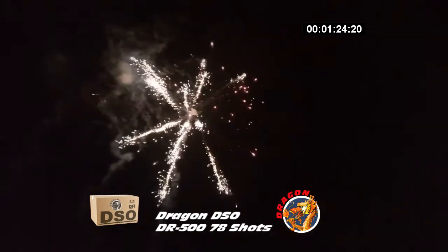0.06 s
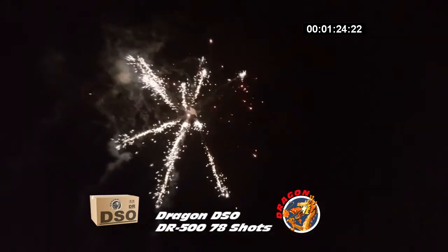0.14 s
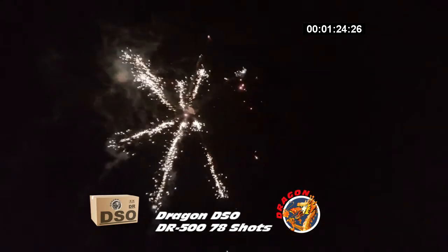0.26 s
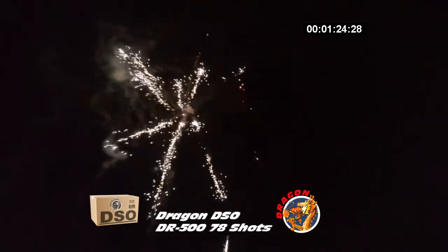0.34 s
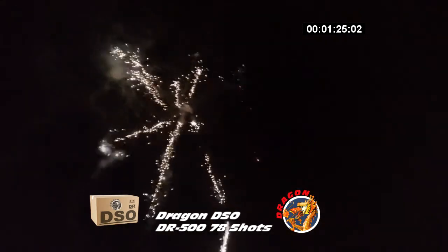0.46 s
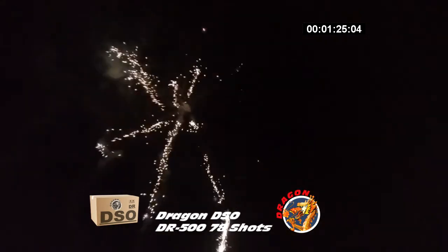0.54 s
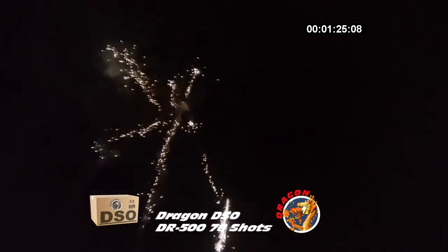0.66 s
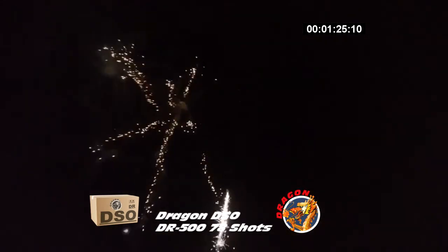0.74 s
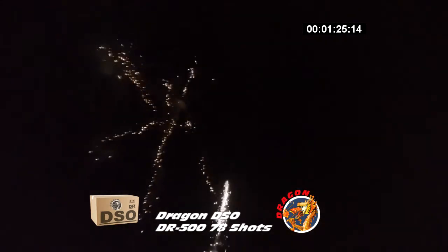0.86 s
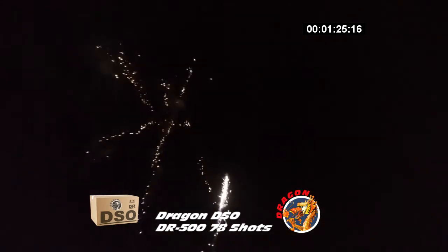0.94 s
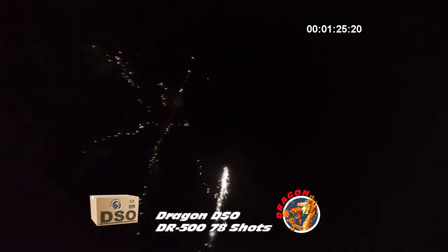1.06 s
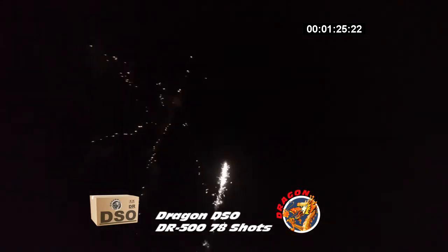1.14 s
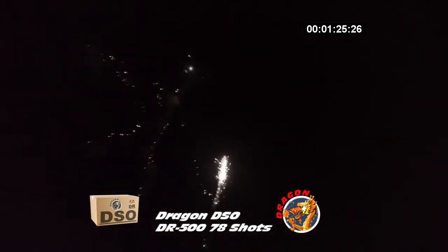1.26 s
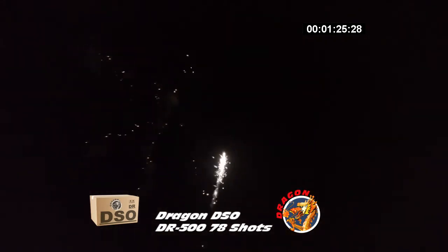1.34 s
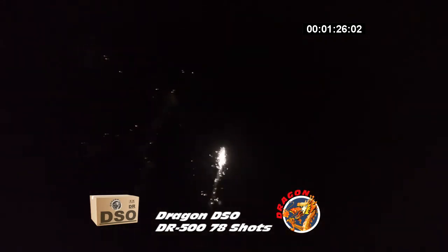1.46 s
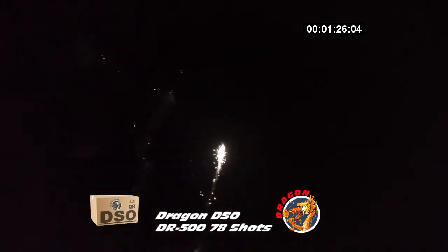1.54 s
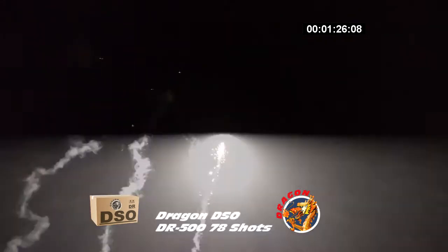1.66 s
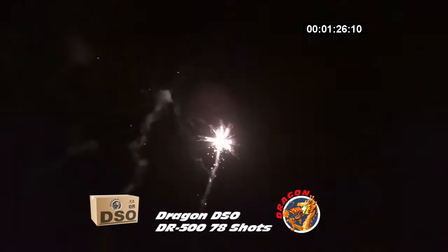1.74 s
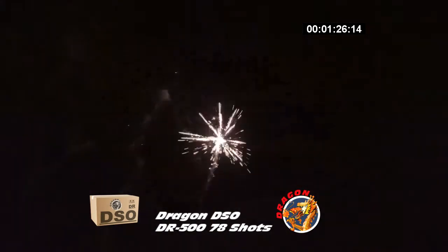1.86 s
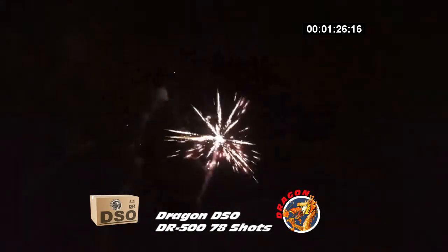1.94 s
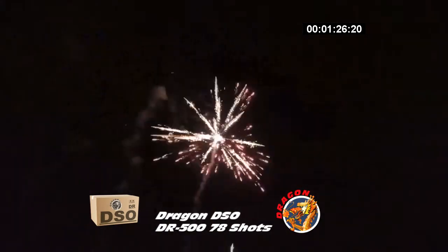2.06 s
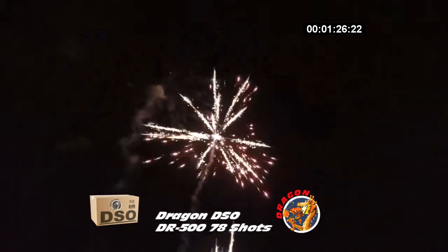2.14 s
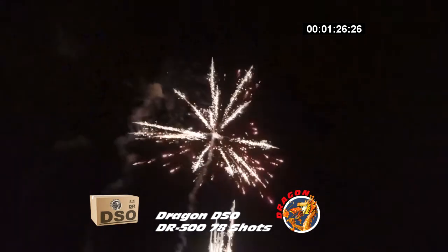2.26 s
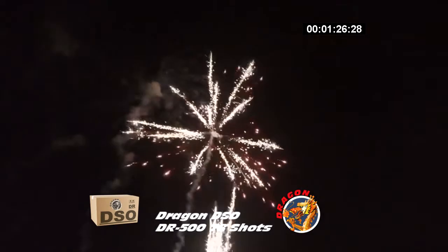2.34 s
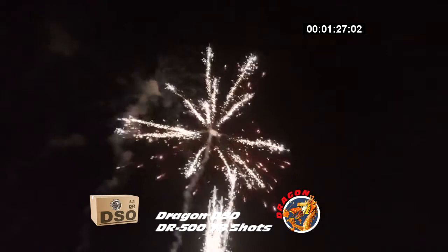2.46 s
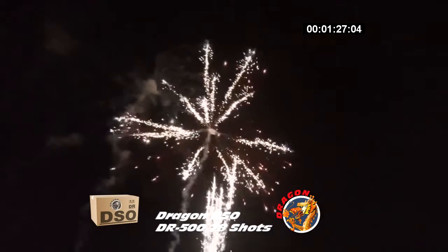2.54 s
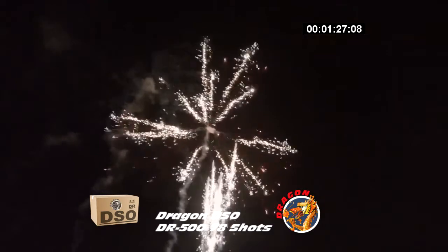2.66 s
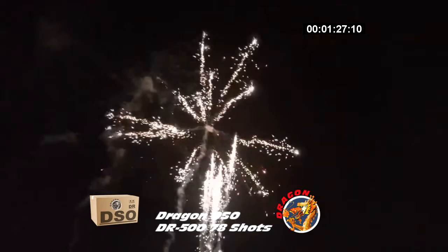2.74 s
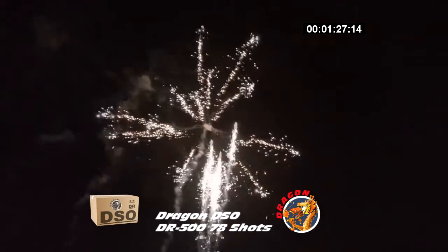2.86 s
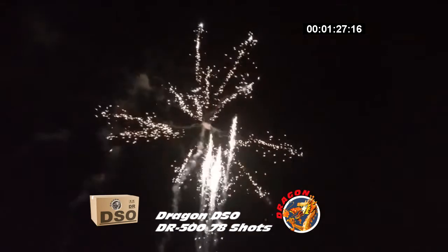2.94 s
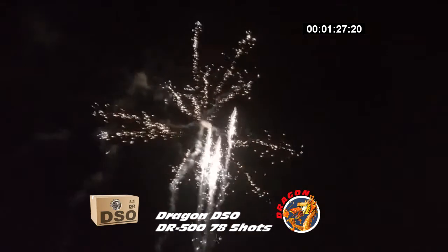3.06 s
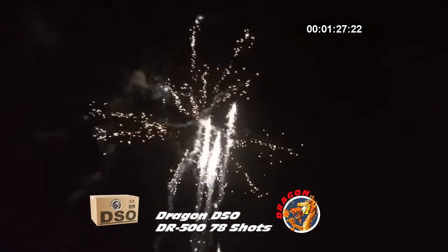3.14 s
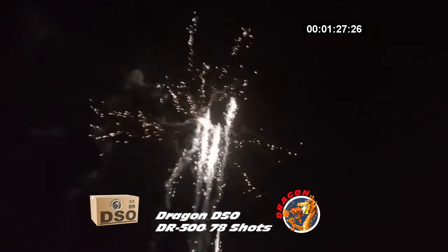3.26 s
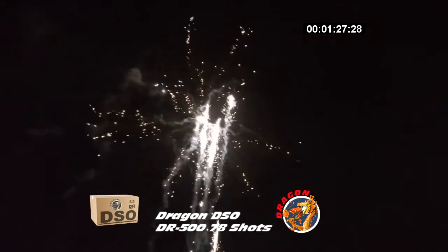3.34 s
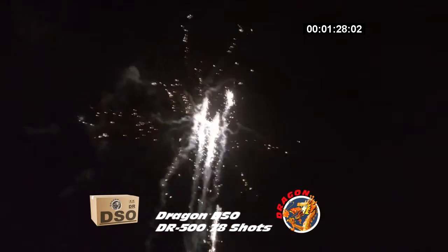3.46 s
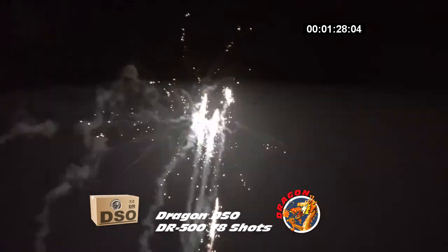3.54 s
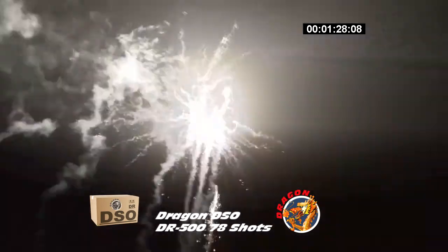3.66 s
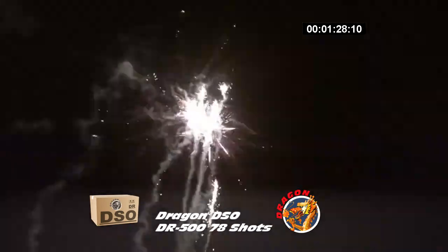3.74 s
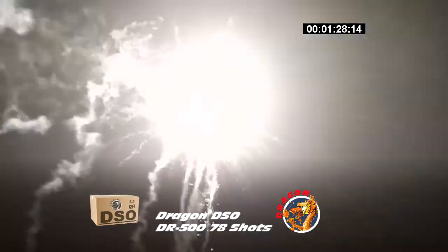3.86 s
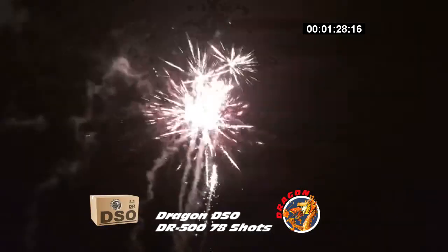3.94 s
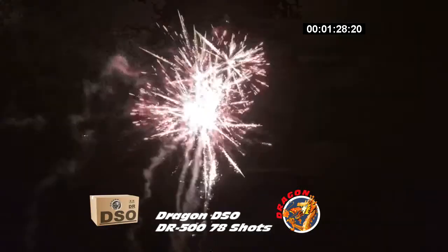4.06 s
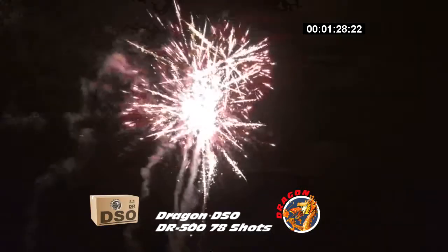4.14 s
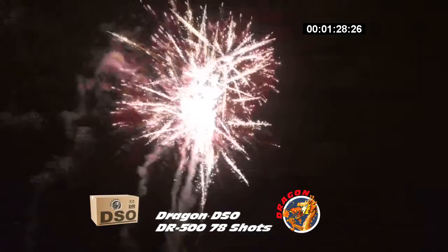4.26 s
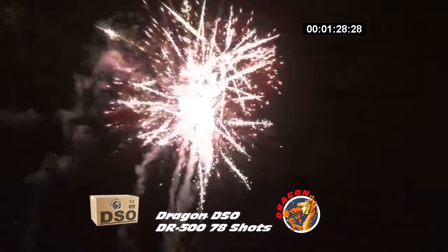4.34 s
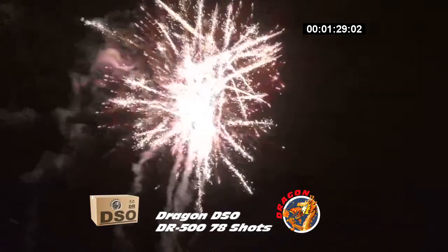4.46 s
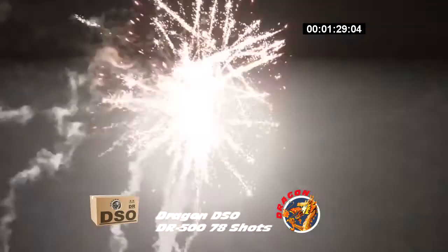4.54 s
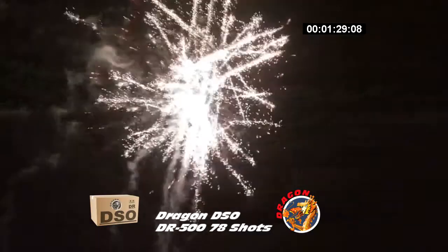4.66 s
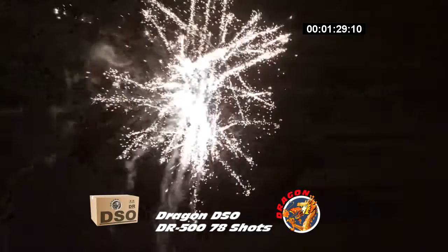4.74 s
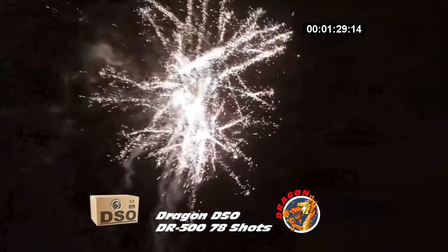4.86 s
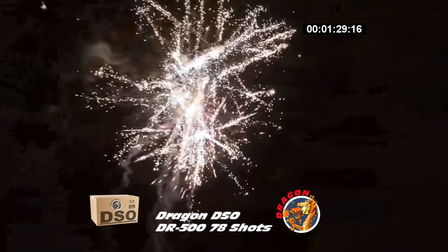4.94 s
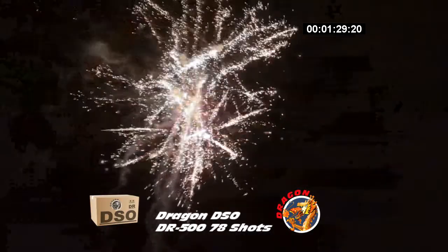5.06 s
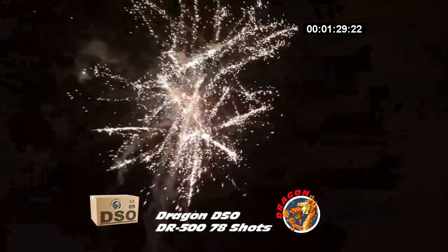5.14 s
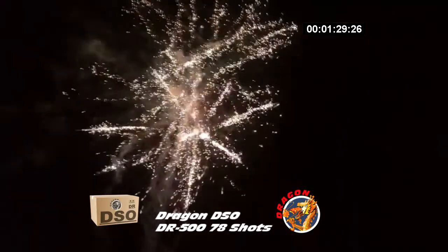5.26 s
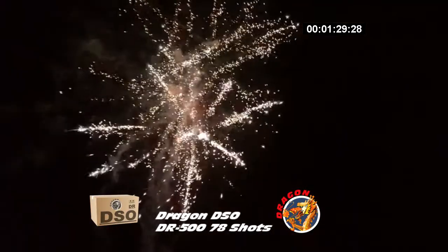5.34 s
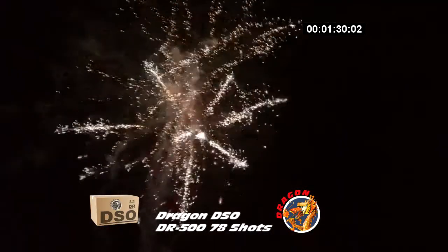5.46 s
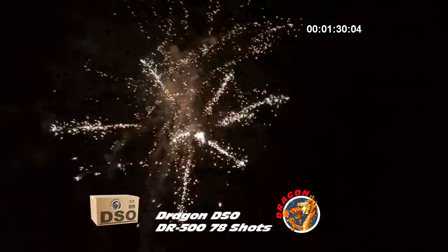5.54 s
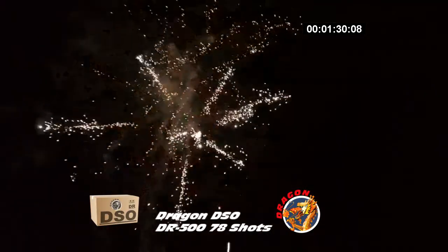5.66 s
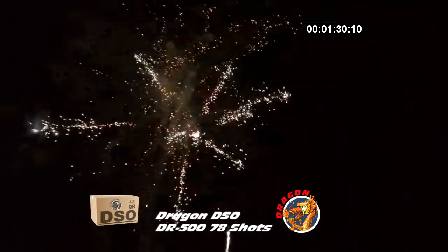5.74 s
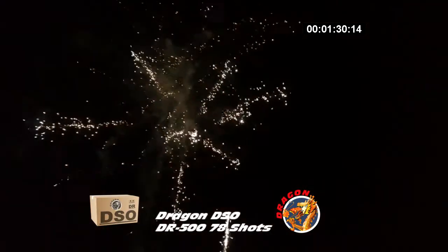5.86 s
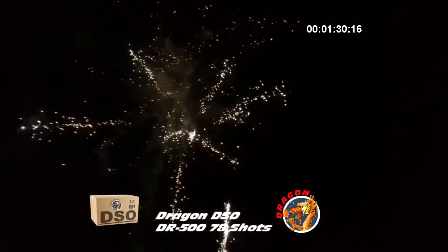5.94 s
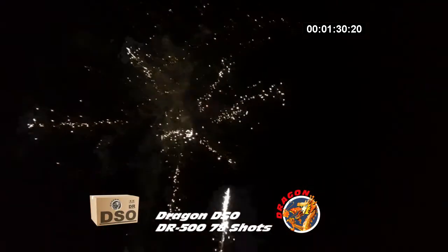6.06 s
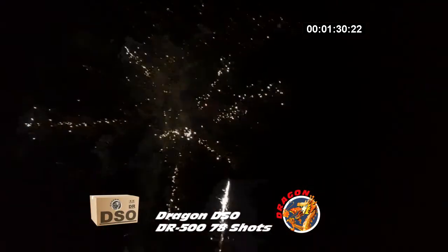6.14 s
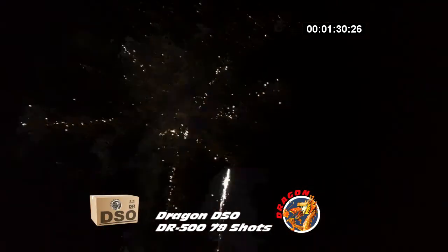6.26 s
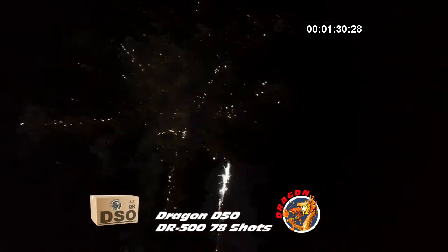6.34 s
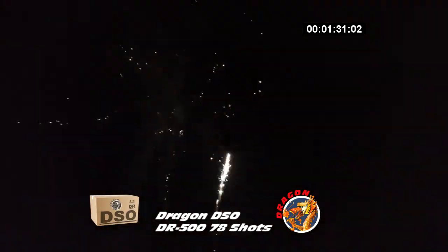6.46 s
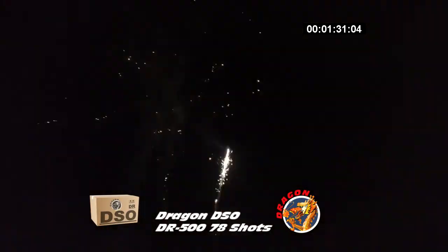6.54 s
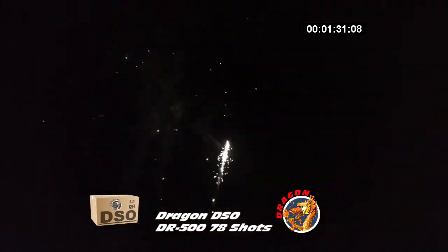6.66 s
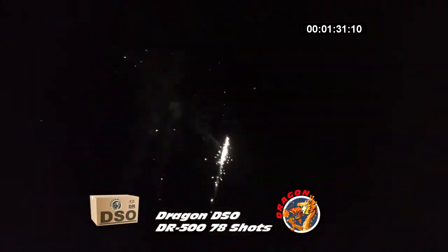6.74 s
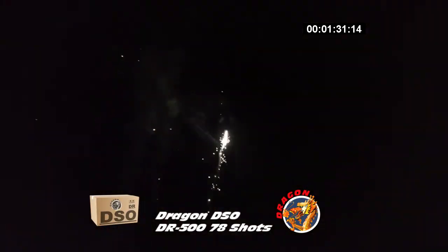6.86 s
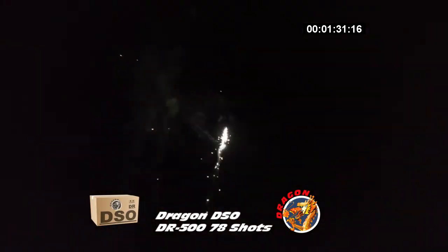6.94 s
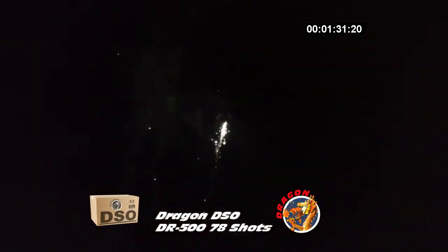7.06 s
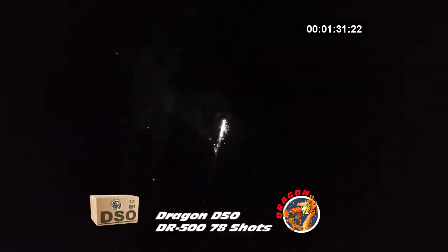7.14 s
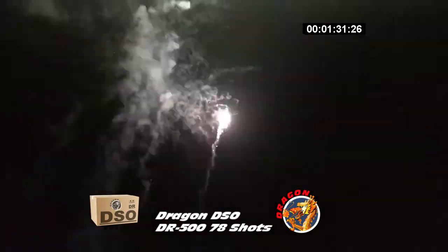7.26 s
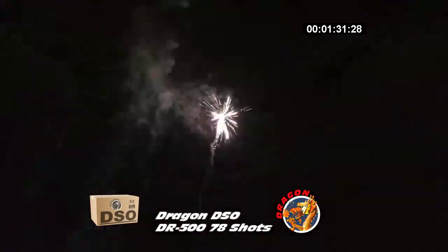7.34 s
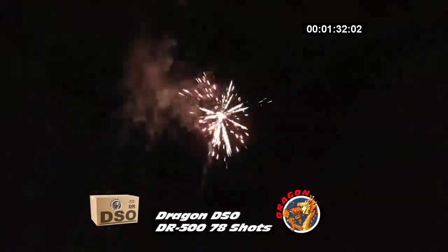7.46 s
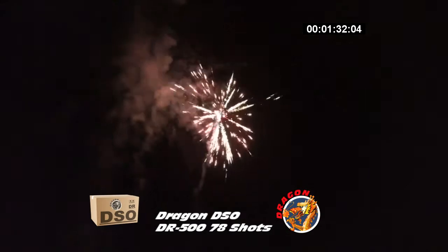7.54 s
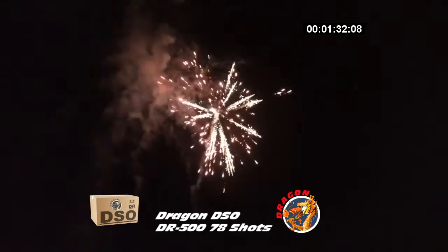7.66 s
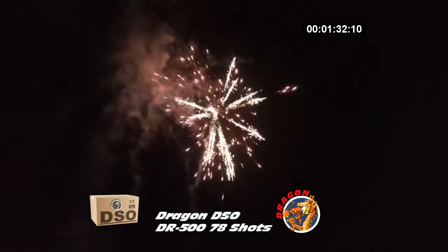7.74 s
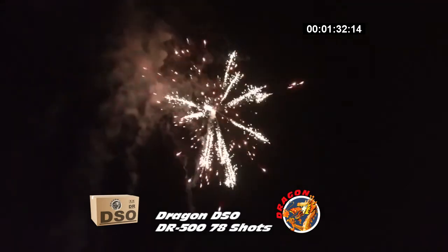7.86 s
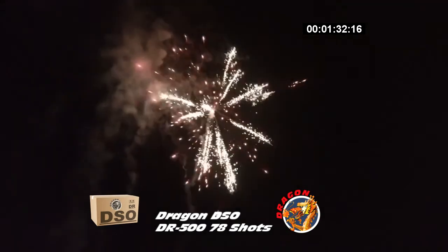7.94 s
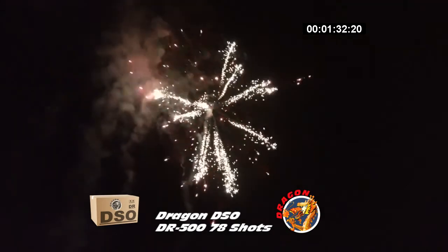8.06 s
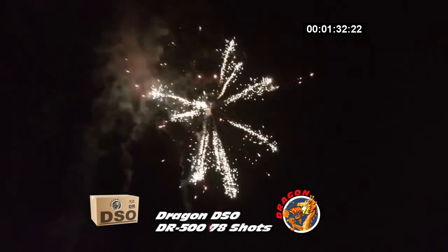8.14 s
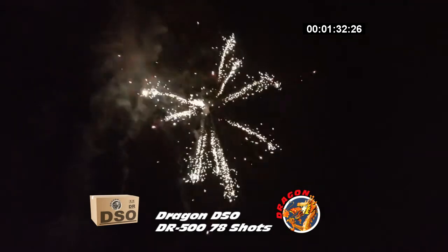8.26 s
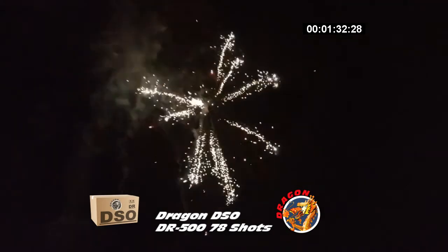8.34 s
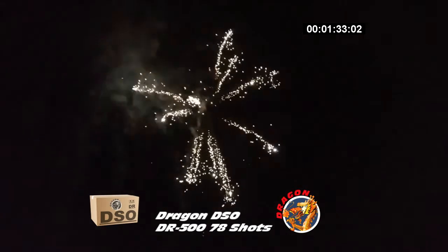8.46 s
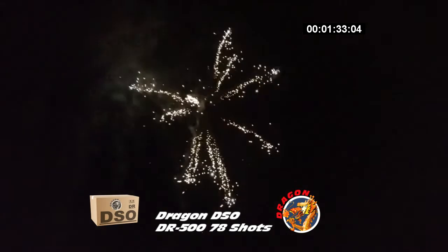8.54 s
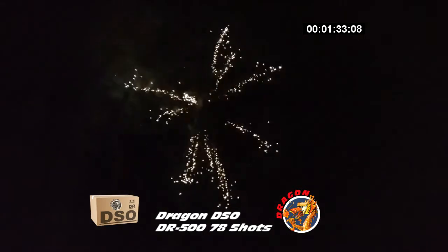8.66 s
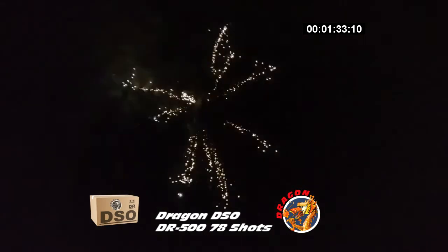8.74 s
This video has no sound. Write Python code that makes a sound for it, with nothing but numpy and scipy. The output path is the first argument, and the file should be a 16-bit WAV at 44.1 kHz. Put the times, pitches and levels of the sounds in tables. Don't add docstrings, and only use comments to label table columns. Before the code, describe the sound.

Outdoors at night, a shower of firework stars crackles and pops over low rumble. Around two seconds launch charges crack raggedly and a shell bangs overhead. Fresh crackle swells, then a tight volley of blasts hits near four seconds. The pops thin to single snaps until a last bang, then fade unevenly. A small camera microphone squashes and ducks around each blast.

```python
import sys
import numpy as np
from scipy import signal
from scipy.fft import rfft, irfft, next_fast_len
from scipy.io import wavfile
from scipy.ndimage import uniform_filter1d, minimum_filter1d

SR = 44100
rng = np.random.default_rng(int(sys.argv[2]) if len(sys.argv) > 2 else 0)


def generate_wav(sig):
    pcm = np.round(np.clip(np.atleast_2d(sig).T, -1, 1) * 32767).astype(np.int16)
    wavfile.write(sys.argv[1], SR, pcm)


def convert_level_to_amplitude(level_db):
    exponent = np.asarray(level_db, float) / 20
    return 10 ** exponent


N = 387638

# t/s, level over the limiter ceiling/dB, ground echo delay/ms, ground echo level/dB
SHELLS = [
    (1.9407, 17, 8.6, -7),
    (3.8485, 20, 8.7, -4),
    (3.9174, 18, 9.1, -5),
    (4.0505, 17, 9.0, -6),
    (4.0687, 7, 9.0, -9),
    (4.0756, 17, 10.1, -8),
    (4.123, 18, 9.5, -5),
    (4.7917, 19, 8.6, -3),
    (7.4937, 15, 9.1, -5),
]
# t/s of the crest, peak level/dB, f/Hz
FAR_THUDS = [(.532, -23, 160), (.615, -30, 150), (0.641, -25, 150), (0.673, -25, 150), (.702, -37, 120),
             (0.821, -27, 140), (0.859, -23, 159), (0.999, -27, 92), (1.904, -12.5, 148), (1.933, -11, 130),
             (2.743, -15, 156), (3.261, -32, 140), (5.343, -19, 165), (6.839, -28, 200),
             (7.163, -26.5, 206), (7.241, -32, 200), (7.353, -24.5, 180), (7.394, -30, 198),
             (7.53, -20, 280), (7.557, -28, 280), (7.615, -29, 250), (7.647, -33, 250), (3.949, -23, 280),
             (3.975, -25, 280), (4.159, -27, 280), (4.278, -27, 250), (4.85, -32, 280)]
# t/s, level/dB, treble against the usual/dB, share falling near the microphone [0-1]
SHOWERS = [(0.0, -25, -11.5, 0), (0.35, -25, -7, 0.4), (0.6, -27, -3, 0.7), (1.15, -30.5, -3, 0.95),
           (1.66, -29.5, -4.5, 0.6), (1.98, -30, -0.5, 0), (2.48, -18, -1, 0), (2.76, -19, -3.5, 0.2),
           (3.2, -23.5, -3.5, 0.6), (3.84, -24.5, -5, 0.1), (4.2, -26.5, -1.5, 0.2), (4.8, -20, -11, 0),
           (5.3, -28, -10, 0.8), (6.1, -34, -2, 1), (7.0, -35, -1, 1), (7.72, -40.5, -6.5, 1),
           (8.25, -27, -9, 0.55), (8.79, -37.5, -9, 1)]
FLIPPED = 0.11


def read(points, hz):
    f, value = np.transpose(points)
    return np.interp(np.log(hz + 1), np.log(f + 1), value)


def curve(rows, order):
    rows = np.array(rows)
    return np.interp(np.arange(N) / SR, rows[:, 0], rows[:, order])


def evened(x):
    return x / np.sqrt(np.mean(x ** 2) + 1e-20)


def add(mix, s, sound):
    part = mix[..., round(s * SR):][..., :sound.shape[-1]]
    part += sound[..., :part.shape[-1]]


def passed(x, hz, kind="low", order=2):
    return signal.sosfilt(signal.butter(order, hz, kind, fs=SR, output="sos"), x)


def coloured(x, points):
    size = next_fast_len(N + SR // 10)
    gain = convert_level_to_amplitude(read(points, np.fft.rfftfreq(size, 1 / SR)))
    return irfft(rfft(x, size) * gain, size)[..., :N]


def causal(points):
    hz = np.abs(np.fft.fftfreq(4096, 1 / SR))
    log_gain = np.log(convert_level_to_amplitude(read(points, hz)))
    click = np.fft.ifft(np.exp(np.conj(signal.hilbert(log_gain)))).real[:1024]
    return click / click.max()


def shock(spike_ms, ring_hz, ring_db, heave_db, turns=0.45):
    ms = np.arange(1400) / SR * 1000
    crest_ms = .4
    half_ms = np.where(ms < crest_ms, .6 * spike_ms, spike_ms)
    spike = np.exp(-((ms - crest_ms) / half_ms) ** 2)
    cycle = np.maximum(ms - crest_ms - spike_ms, 0) * ring_hz / 1000
    ring = np.sin(2 * np.pi * cycle) * np.exp(-((cycle - .35) / turns) ** 2)
    heave = np.sin(2 * np.pi * 90 * ms / 1000) * np.exp(-ms / 6)
    heave = heave * (1 - np.exp(-(ms / 1.5) ** 2))
    return spike - convert_level_to_amplitude(ring_db) * ring - convert_level_to_amplitude(heave_db) * heave


def scatter(seconds, t60, hz, rise_s, unlike=1.0, lumpy_db=4):
    t = np.arange(round(seconds * SR)) / SR
    middle, side, lumps = rng.standard_normal((3, len(t)))
    lumps_db = lumpy_db * evened(passed(lumps, 46.0))
    shape = convert_level_to_amplitude(lumps_db - 60 * t / t60) * (1 - np.exp(-t / rise_s))
    short_waves = passed(passed(side, 1160, "high"), 10400, order=1)
    side = unlike * short_waves + 0.049 * side
    tail = passed(np.array([middle + side, middle - side]), hz) * shape
    return tail / np.linalg.norm(tail[0])


def smeared(sound, tail):
    return signal.fftconvolve(sound, tail, axes=1)


def flared(order, change):
    # t/s, level
    # change/dB, half length/s, treble change/dB
    flares = [(0.572, 1.5, 0.012, 7), (1.044, -2, 0.0054, -7), (1.136, -14, 0.008, -1),
              (1.735, 8.5, 0.0077, 14), (1.797, -1, 0.063, -4.5), (1.91, 8.5, 0.023, -19),
              (2.585, -6, 0.03, 4), (3.878, 3.5, 0.028, -2), (3.973, -1, 0.12, 3.5), (4.907, 3, 0.11, 5),
              (5.03, 2, 0.074, 1.5), (6.088, -6.5, 0.015, -2), (6.139, -9, .004, -5.5),
              (6.333, -1.5, 0.074, 2), (6.608, -1.5, 0.41, -4.5), (4.432, -2.5, .05, 0),
              (7.456, -7, 0.0149, -5), (2.194, 0, 0.034, -2), (6.852, -5, 0.0085, -4),
              (7.066, -3.5, 0.0048, -2), (7.168, -4, 0.005, -1), (7.32, 5, 0.0057, -4),
              (8.437, -7, 0.0046, -2), (8.662, -3.5, .012, -3), (0.45, -5, 0.0066, -2),
              (8.502, -3.5, .015, -3), (8.647, -4, .015, 0), (8.737, -12, 0.006, -11),
              (8.79, 6, 0.0059, -5)]
    t = np.arange(0, N / SR, .001)
    bumps = sum(row[change] * np.exp(-((t - row[0]) / row[2]) ** 2) for row in flares)
    return curve(SHOWERS, order) + np.interp(np.arange(N) / SR, t, bumps)


def crackle_db():
    return flared(1, 1)


def rumble():
    # f/Hz, level/dB per Hz
    low_band = [(12, -56), (20, -20), (65, -2.5), (197, -4), (245, -12.5), (280, -5.5), (500, -8.5),
                (650, -18), (1100, -120)]
    # t/s, level/dB, half length/s
    gusts = [
        (0.0, -39.5, 0.29),
        (0.613, -36, 0.16),
        (1.504, -45, 0.036),
        (2.35, -38, 0.5),
        (5.6, -46.5, 0.17),
        (6.68, -42, 0.18),
        (7.194, -45, 0.24),
        (7.95, -44, 0.33),
        (8.494, -43, .25),
    ]
    star_roll_db = -23.5
    a, b, lumps = rng.standard_normal((3, N))
    roll = coloured(np.array([a + 1.04 * b, a - 0.5 * b]), low_band)
    roll = roll * convert_level_to_amplitude(3.2 * evened(passed(lumps, 5.7)))
    t = np.arange(0, N / SR, .001)
    power = sum(convert_level_to_amplitude(db) ** 2 * np.exp(-((t - s) / half) ** 2) for s, db, half in gusts)
    for rows, roll_db, t60 in (SHELLS, -47, 1.4), (FAR_THUDS, -15, 0.62):
        for s, db, *_ in rows:
            since = np.maximum(t - s, 0)
            power += convert_level_to_amplitude(db + roll_db - 60 * since / t60) ** 2 * (1 - np.exp(-since / .018))
    power = np.interp(np.arange(N) / SR, t, power)
    power = power + convert_level_to_amplitude(curve(SHOWERS, order=1) + star_roll_db) ** 2
    return np.sqrt(power) * evened(roll)


def thuds():
    out = np.zeros((2, N))
    t = np.arange(-600, 900)[None] / SR
    for s, peak_db, hz in FAR_THUDS:
        thud = convert_level_to_amplitude(peak_db) * np.cos(2 * np.pi * hz * t) * np.exp(-(t * hz / 0.52) ** 2)
        start = s + t[0, 0]
        add(out, start, thud)
        add(out, start, convert_level_to_amplitude(-14) * smeared(thud, scatter(.08, .1, 900, .003)))
    return out


def cracks():
    out = np.zeros((2, N))
    # t/s, peak level/dB, length/s
    volley = [(1.673, -14, .02), (1.6785, -8, .012), (1.687, -3, .016), (1.707, -13, .035),
              (1.7138, -5, .015), (1.733, -6, .035), (1.7385, -7, .035), (1.742, -2, .022),
              (1.862, -13, .035), (1.871, -14, .025), (1.896, -9, .035), (1.903, -10, .045),
              (1.917, -11, .04), (1.9235, -4, .035), (1.9265, -3, .025), (7.335, -19, .05)]
    for s, peak_db, length in volley:
        crack = passed(scatter(.05, 1.6 * length, 2400, .001, lumpy_db=0), 1100, "high")
        crack = passed(crack, 2700)
        add(out, s, convert_level_to_amplitude(peak_db + 3.5) * crack / np.abs(crack).max())
    return out


def lifts():
    out = np.zeros((2, N))
    # t/s, level over the limiter ceiling/dB, shove level/dB, roll level/dB
    charges = [
        (1.6879, 2, -17, -11),
        (1.7147, 9.5, -10, -24),
        (1.7356, -2, -3, -25),
        (1.7422, 6, -15, -19),
        (2.5544, 13, -18, -18),
        (5.1538, 7.5, -10.5, -24.5),
    ]
    for s, over_db, shove_db, roll_db in charges:
        shove = convert_level_to_amplitude(over_db + shove_db) * shock(.6, 200, -1, -13)[None]
        spit = convert_level_to_amplitude(over_db - 1.5) * shock(.08, 1900, -3, -40, turns=1.1)[None]
        add(out, s + 0.000067, shove)
        add(out, s - .0004, spit)
        add(out, s + 0.0088, convert_level_to_amplitude(roll_db) * smeared(shove, scatter(0.23, 0.42, 1600, 0.0019)))
    return out


def near_stars():
    # t/s, peak level/dB
    loudest_pops = [(.4084, -7), (.463, -7), (.497, -8), (.5599, -5), (.5691, -6), (.5774, -5), (.6755, -7),
                    (.7379, -6), (.7852, -7), (.8228, -7), (.8491, -6), (.8578, -6), (.9663, -7),
                    (1.0678, -8), (1.1268, -8), (1.1455, -9), (1.2313, -9), (1.3084, -8), (1.3829, -8),
                    (1.4327, -6), (1.496, -9), (1.5885, -8),
                    (5.5329, -9), (5.7267, -9), (5.8513, -9), (6.0091, -9), (6.0686, -13), (6.1579, -11),
                 (6.2298, -13), (6.3175, -11), (6.6009, -12), (6.7167, -13), (6.7903, -13), (6.8674, -12),
                 (6.9372, -12), (6.9874, -11), (7.0753, -12), (7.1725, -15), (7.284, -12), (7.3413, -12),
                 (7.4051, -14), (7.4297, -15), (7.472, -20), (7.5926, -17), (7.6672, -14), (7.8028, -18),
                 (7.9139, -15), (8.4607, -12), (8.5321, -14), (8.6798, -13), (8.7175, -13), (8.7471, -17)]
    per_s, over_crackle_db, spread_db = 49, 23.5, 0
    place, size, flip = rng.random((round(per_s * N / SR), 3)).T
    at = (place * (N - 1)).astype(int)
    patter = convert_level_to_amplitude(crackle_db()[at] + over_crackle_db + spread_db * (2 * size + 2))
    patter = patter * np.clip(curve(SHOWERS, order=3)[at], 0, 1) * np.sign(flip - FLIPPED)
    s, peak_db = np.transpose(loudest_pops)
    return np.append(at, (s * SR).astype(int)), np.append(patter, convert_level_to_amplitude(peak_db + 4))


def stars(count=9):
    # f/Hz, level/dB per Hz
    pop_spectrum = [(100, -34), (200, -17.5), (400, -9.5), (760, -3.5), (1300, -1.5), (1650, 1.5),
                    (2200, 0.5), (2750, -5), (3500, -2.5), (4750, -1.5), (6000, -5.5), (7200, -9),
                    (9000, -10), (10800, -13.5)]
    pop = causal(pop_spectrum)
    most = 9000
    clumps_db = 1.1 * evened(passed(rng.standard_normal(N), 45))
    level_db = crackle_db() + 2.5 + clumps_db
    per_s = np.clip(300 * convert_level_to_amplitude(1.3 * (level_db + 35.0)), 50, most)

    place, keep, size, side = rng.random((round(most * N / SR), 4)).T
    at = (place * N).astype(int)
    flip = np.sign(rng.random(len(at)) - FLIPPED)
    size = convert_level_to_amplitude(-3.5 * np.log(1 - .95 * size)) * (keep < per_s[at] / most)
    trains = np.zeros((count, N))
    np.add.at(trains, ((side * count).astype(int), at), size * flip)
    usual = np.sqrt(per_s / SR * np.mean(size[size > 0] ** 2))
    trains *= convert_level_to_amplitude(level_db + 3.5) / usual / np.linalg.norm(pop)
    at, size = near_stars()
    trains[rng.integers(0, count, len(at)), np.maximum(at - pop.argmax(), 0)] += size

    size = next_fast_len(N + SR // 2)
    side = np.linspace(-1, 1, count)[:, None]
    hz = np.fft.rfftfreq(size, 1 / SR)
    lag = np.exp(2j * np.pi * hz * side * 15e-6)
    shade = convert_level_to_amplitude(9.3 * side * hz / (hz + 3000))
    ground = convert_level_to_amplitude(-19) * np.exp(-2j * np.pi * hz * (.009 + 0.00097 * side)) / (1 + 1j * hz / 4000)
    tails = []
    for _ in side:
        field = convert_level_to_amplitude(-11) * scatter(.25, 0.4, 11000, 0.0012, .5)
        close = convert_level_to_amplitude(-14.5) * scatter(.25, 0.0082, 9000, .0003, 1.0)
        tails.append(field + close)
    tails = np.array(tails)
    ports = np.array([lag / shade, shade / lag]) * (1 + ground) + rfft(tails.swapaxes(0, 1), size)
    heard = (ports * rfft(trains, size)).sum(1) * rfft(pop, size)
    lead = np.exp(.45j)
    pops = irfft(heard * lead, size)[:, :N]
    treble = passed(pops, 1840, "high", order=1)
    return pops + (convert_level_to_amplitude(flared(2, 3)) - 1) * treble


def bursts():
    out = np.zeros((2, N))
    wall_return = [-23.5, -32, -43, -24, -24, -24, -24.5, -27, -24]
    for (s, over_db, ground_ms, ground_db), wall_db in zip(SHELLS, wall_return):
        front = shock(.17, 235, -8.5, -24) + .12 * shock(.1, 1800, 0, -40, turns=1.6)
        wave = convert_level_to_amplitude(over_db + 3.5) * front[None]
        s -= .0004
        add(out, s, wave)

        bounce = passed(passed(wave * [[1], [.95]], 3500, order=1), 220, "high", order=1)
        add(out, s + ground_ms / 1000 - .0001, convert_level_to_amplitude(ground_db + 1.2) * bounce)

        thinned = wave - 0.28 * passed(wave, 680)
        roll = smeared(thinned, scatter(0.49, 0.8, 3050, 0.0011, lumpy_db=2.5))
        add(out, s + .012, convert_level_to_amplitude(-22) * roll)

        hiss = passed(scatter(0.48, 0.75, 4800, 0.0013, 1.0, lumpy_db=4.0), 1300, "high")
        add(out, s + 0.0089, convert_level_to_amplitude(over_db - 4.5) * hiss)

        slap = passed(wave, 960, "high", order=1) + 0.33 * wave + 0.43 * passed(wave, 206)
        wall = smeared(slap, scatter(0.053, 0.11, 1160, 0.02, lumpy_db=0.0))
        add(out, s + .227, convert_level_to_amplitude(wall_db - 3.0) * wall)
    return out


def scene():
    return rumble() + thuds() + cracks() + lifts() + stars() + bursts()


def roll_off(x):
    return signal.sosfilt(signal.butter(12, 15700, fs=SR, output="sos"), x)


def record(dry):
    # f/Hz, level/dB
    kept_band = [(100, 0), (10900, 0), (11400, -60), (22000, -60)]
    # f/Hz, level/dB
    treble_sliver = [(11300, -78), (11500, -37), (12700, -53), (13200, -15.5), (14900, -22), (15400, -60)]
    over_db = np.maximum(20 * np.log10(np.abs(dry).max(0) + 1e-9) + 1.5, 0)
    ahead = -minimum_filter1d(-over_db, 300, origin=-149)
    t = np.arange(N) / SR
    quick = np.maximum.accumulate(ahead + 500 * t) - 500 * t
    slow = np.maximum.accumulate(0.46 * ahead + 35 * t) - 35 * t
    ducking_db = uniform_filter1d(np.maximum(quick, slow), 40, origin=19)
    ducked = dry / convert_level_to_amplitude(ducking_db)
    top = signal.stft(coloured(ducked + 0.8 * ducked.mean(0), treble_sliver), nperseg=512)[2]
    patches = evened(uniform_filter1d(rng.standard_normal(top.shape[1:]), 3, 1)) > .2
    flicker = signal.istft(top * patches, nperseg=512)[1][:, :N]
    mix = np.clip(coloured(ducked, kept_band) + flicker, -.96, .96)
    return roll_off(mix)


dry = scene()
out = record(dry)
generate_wav(out)
```